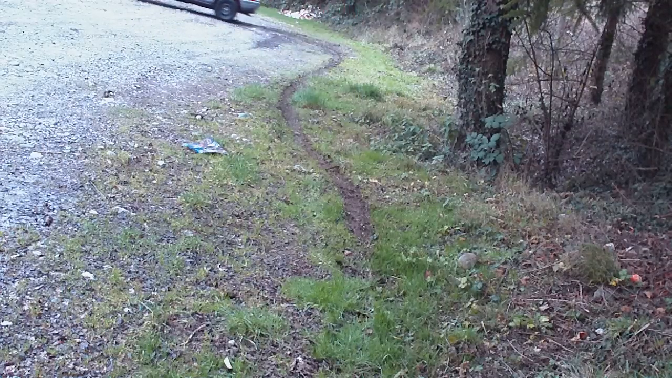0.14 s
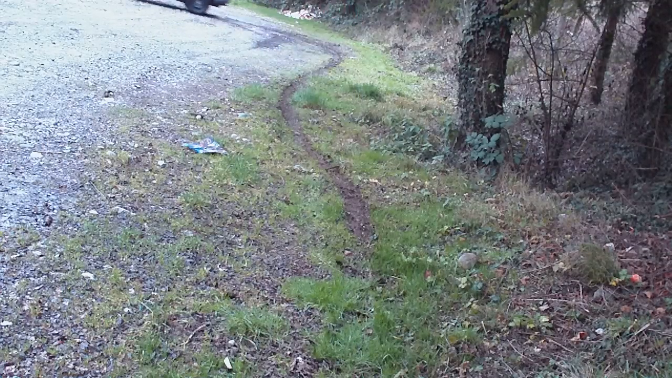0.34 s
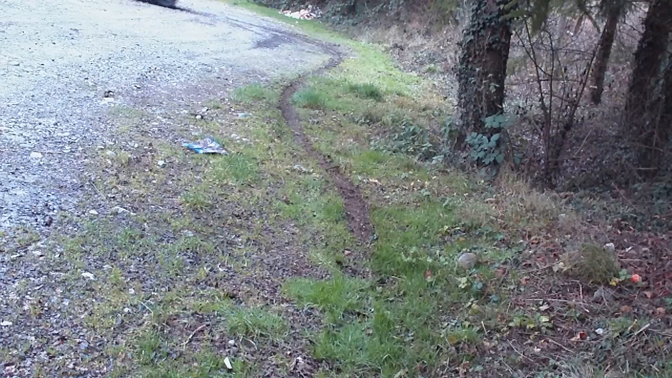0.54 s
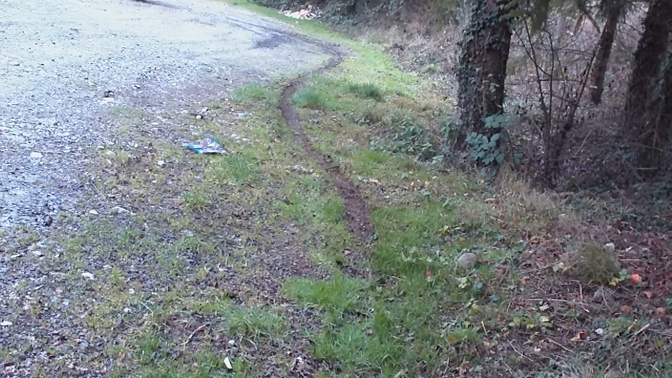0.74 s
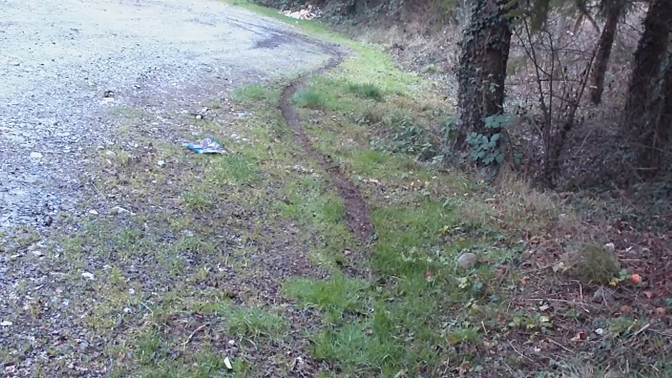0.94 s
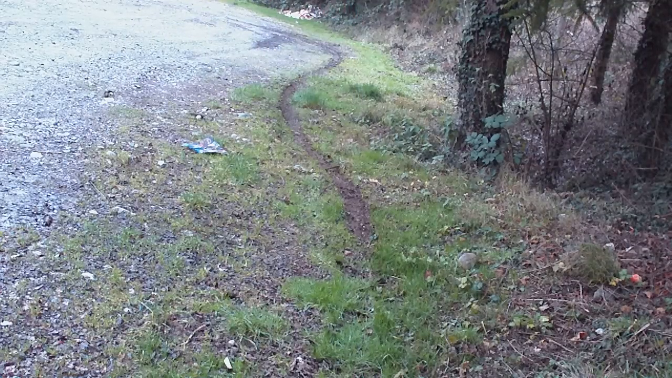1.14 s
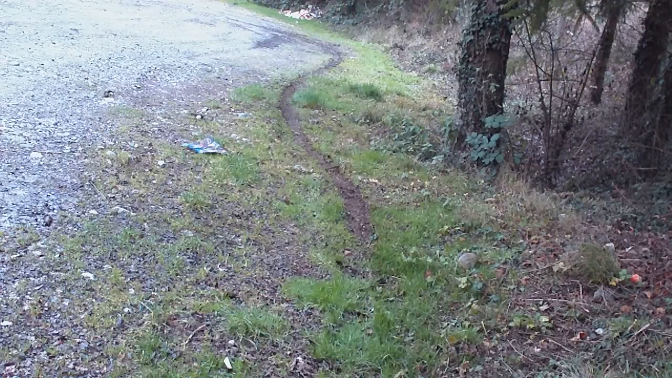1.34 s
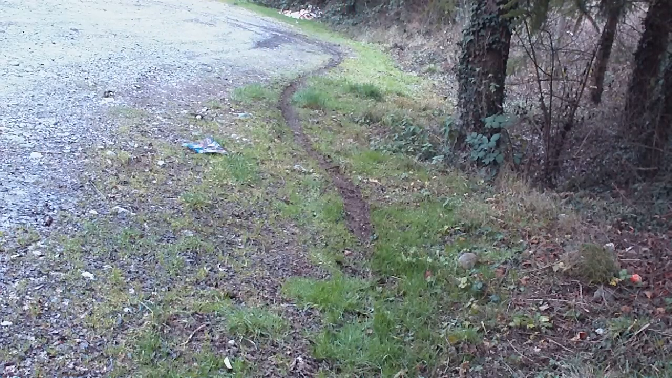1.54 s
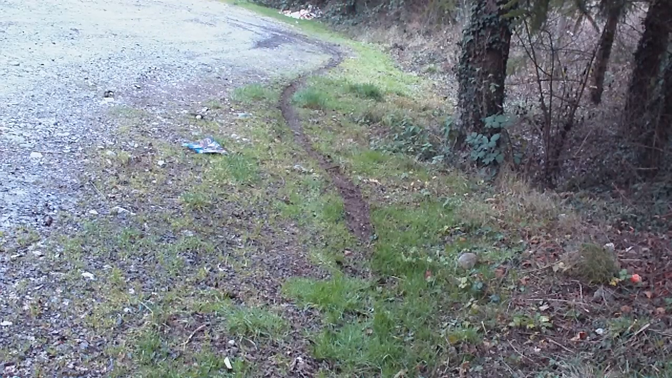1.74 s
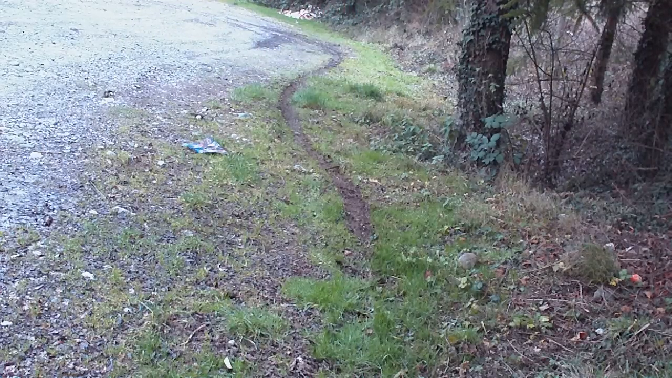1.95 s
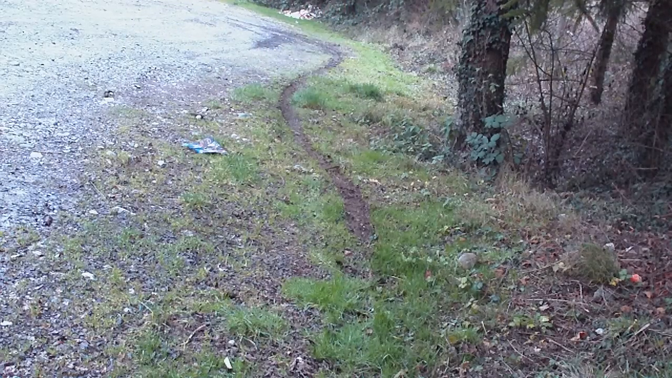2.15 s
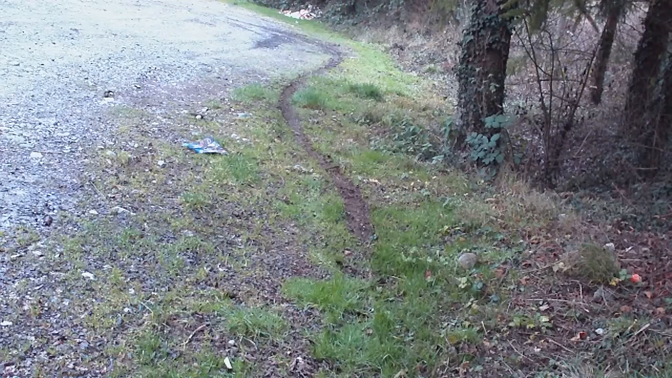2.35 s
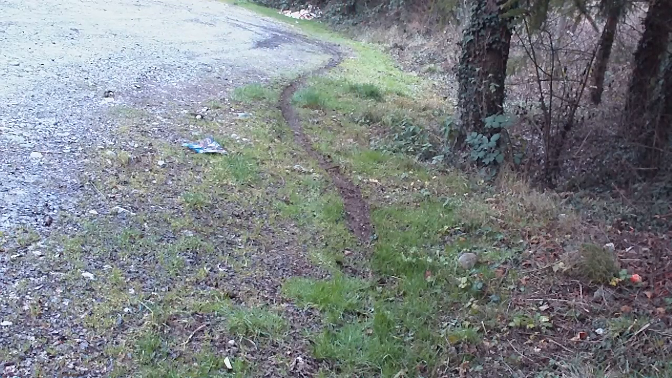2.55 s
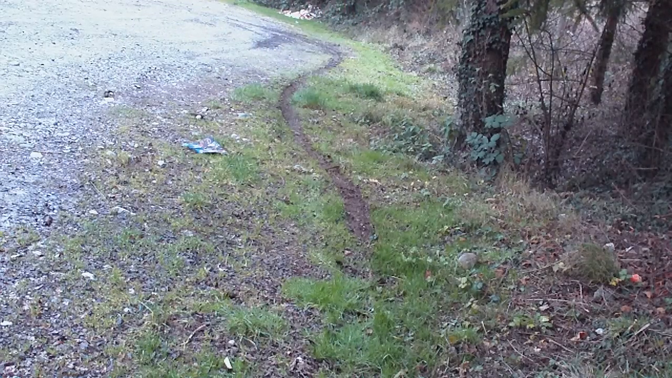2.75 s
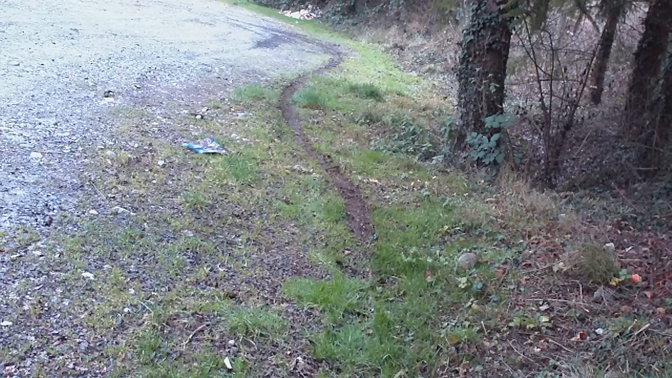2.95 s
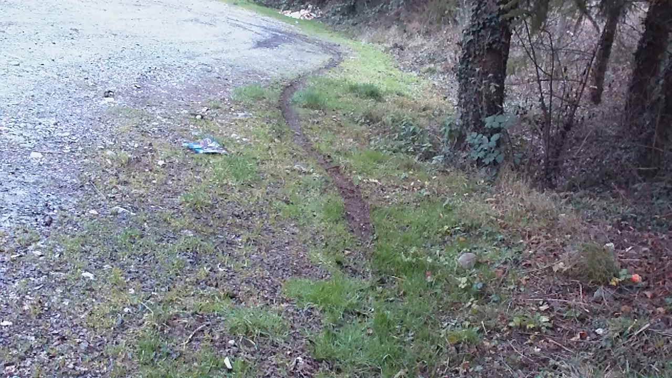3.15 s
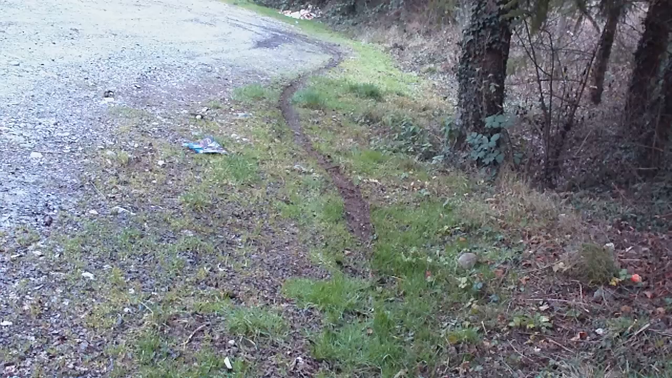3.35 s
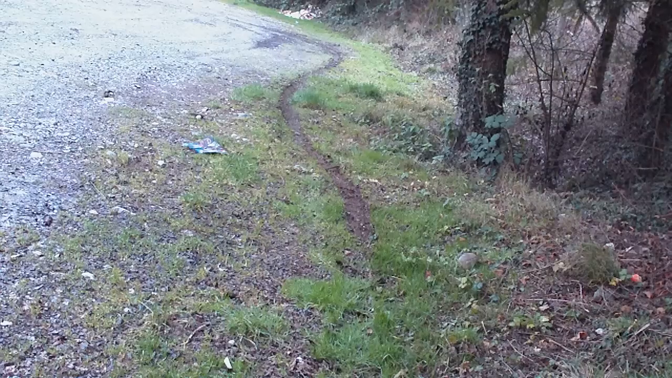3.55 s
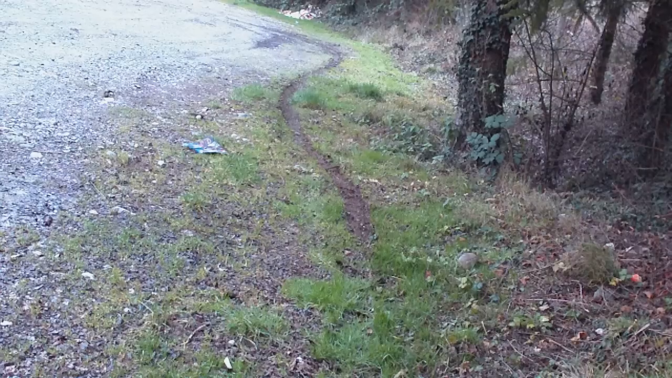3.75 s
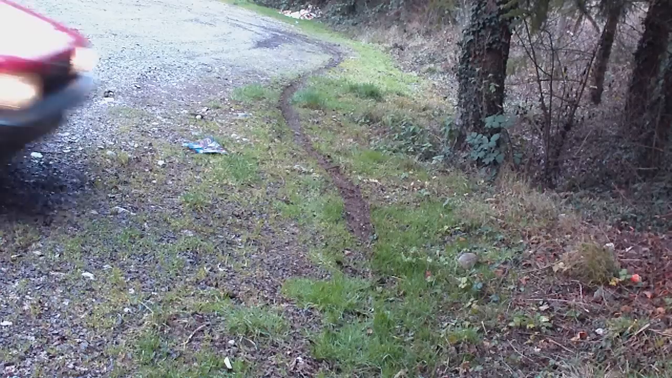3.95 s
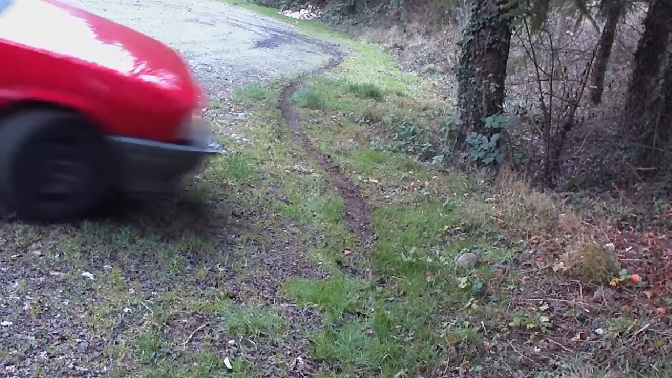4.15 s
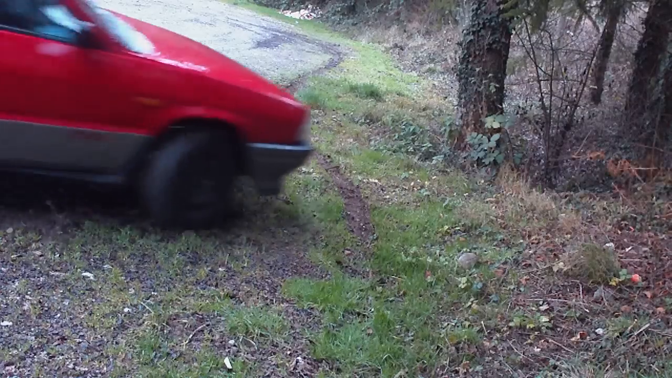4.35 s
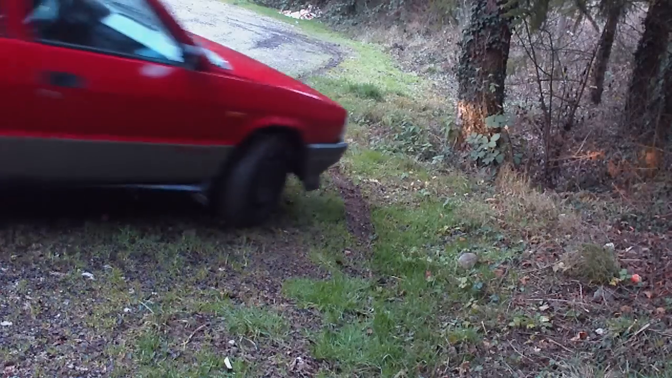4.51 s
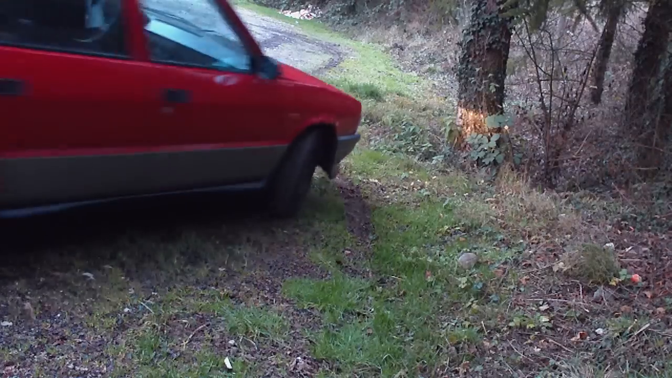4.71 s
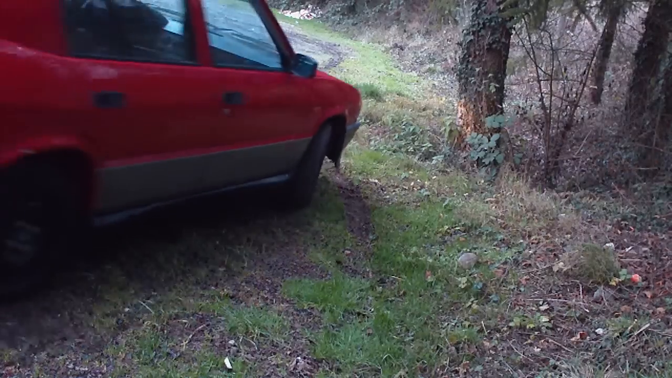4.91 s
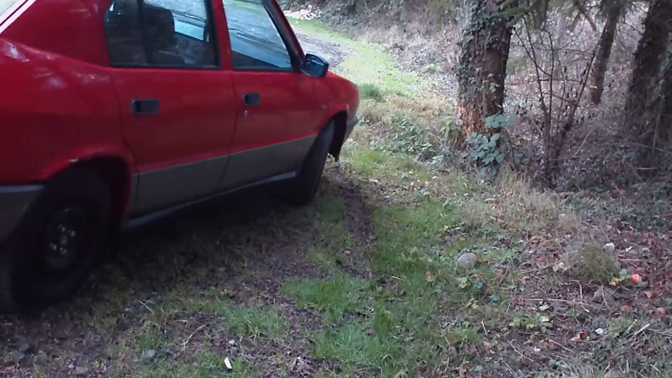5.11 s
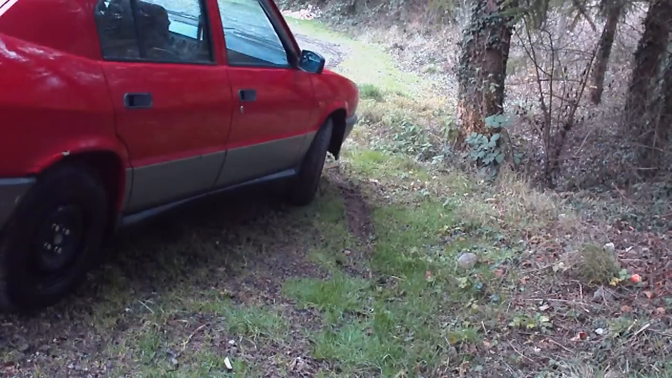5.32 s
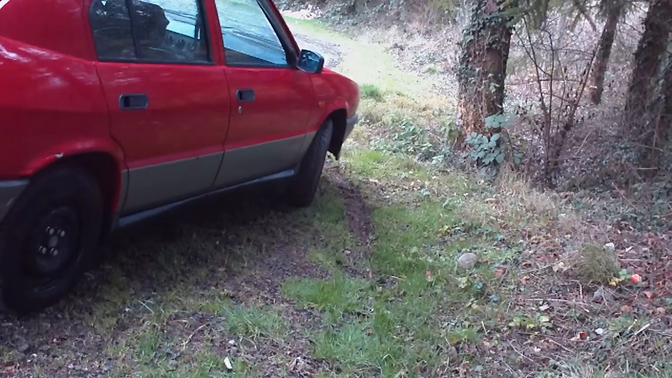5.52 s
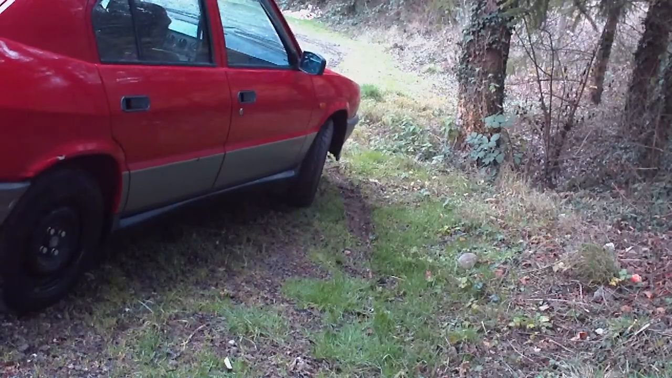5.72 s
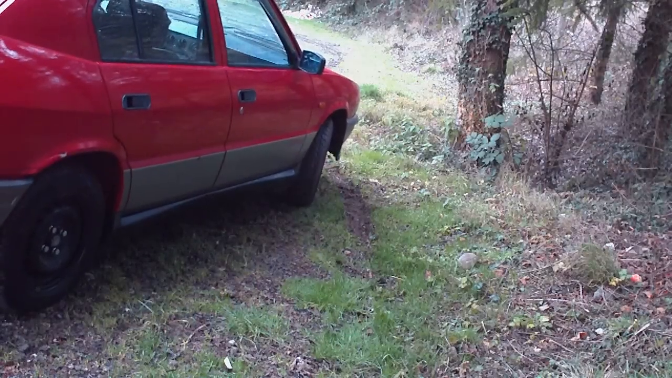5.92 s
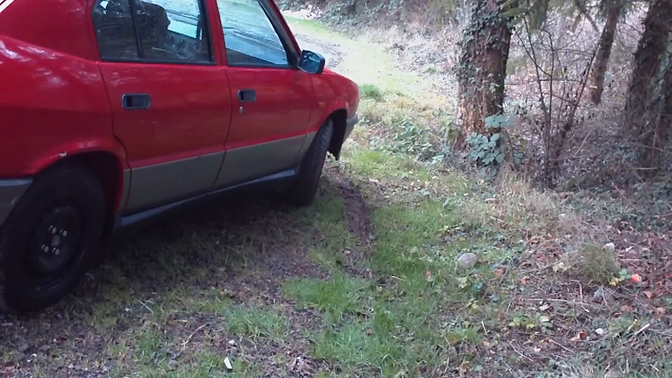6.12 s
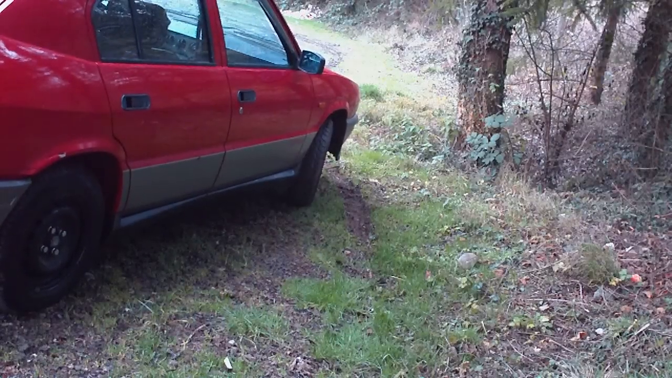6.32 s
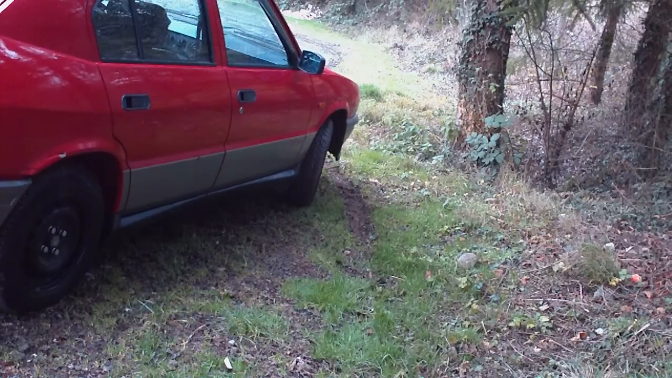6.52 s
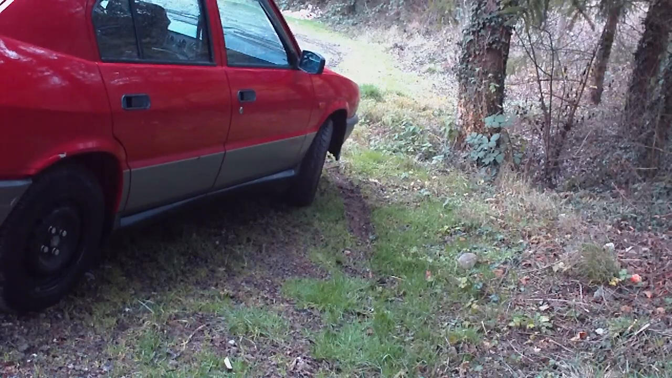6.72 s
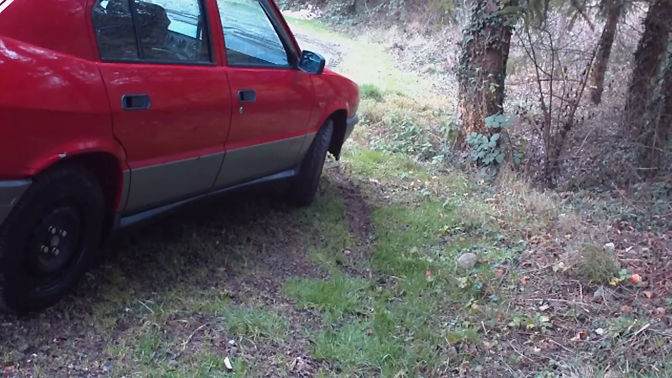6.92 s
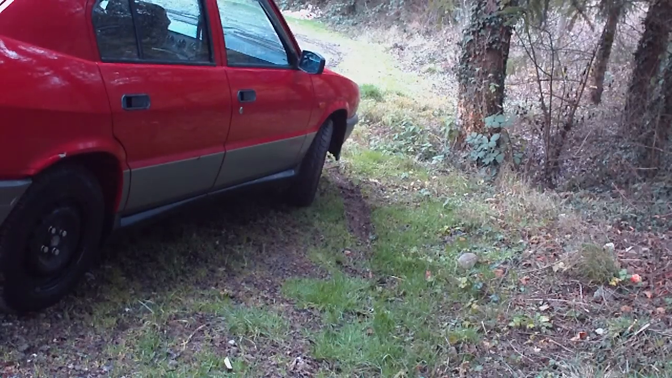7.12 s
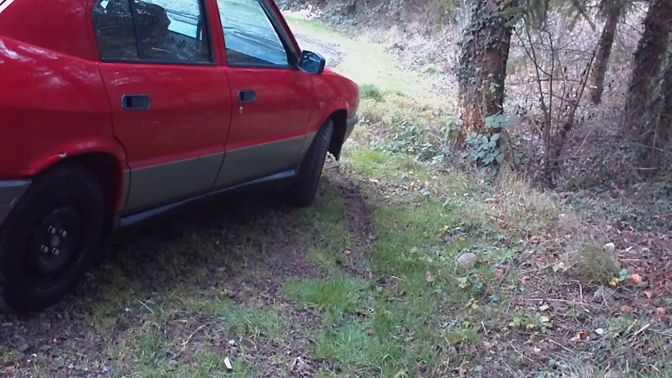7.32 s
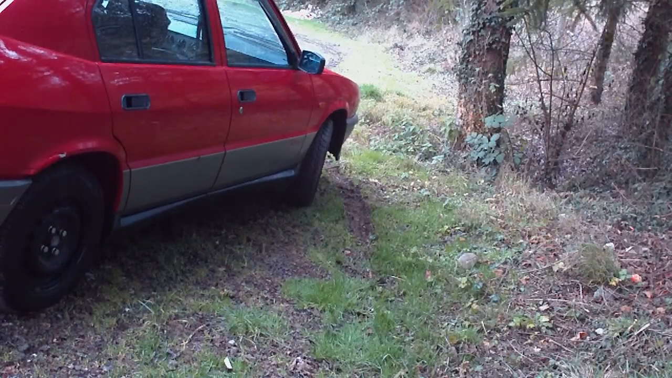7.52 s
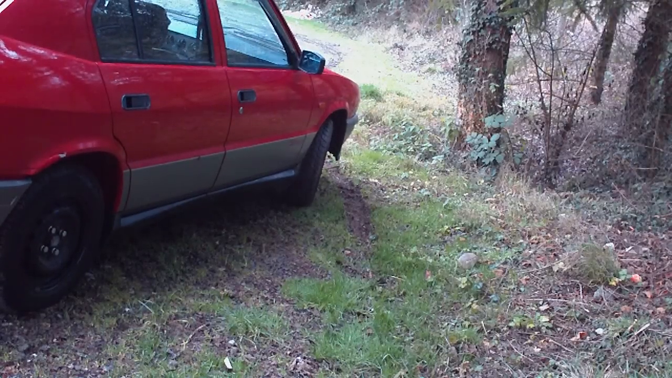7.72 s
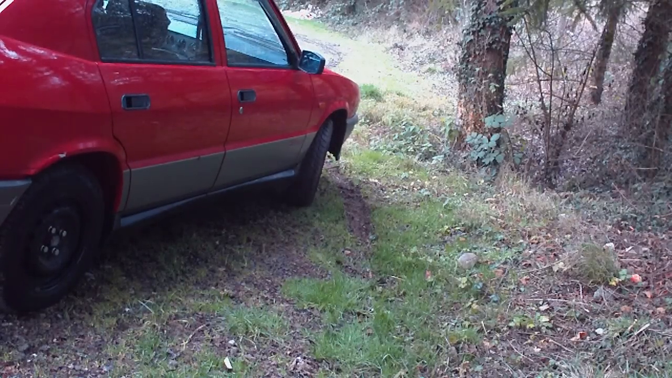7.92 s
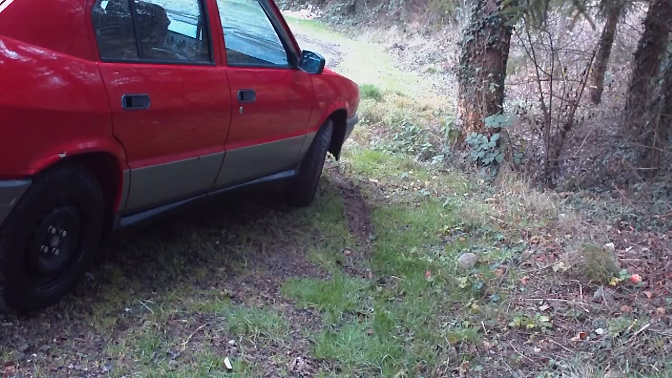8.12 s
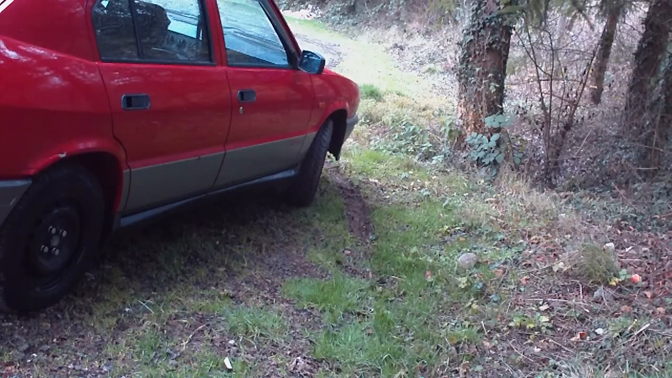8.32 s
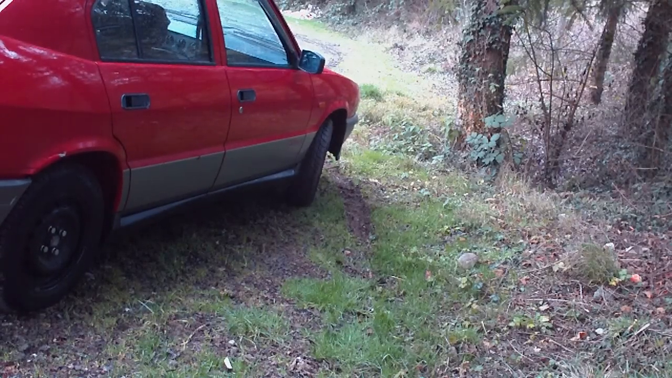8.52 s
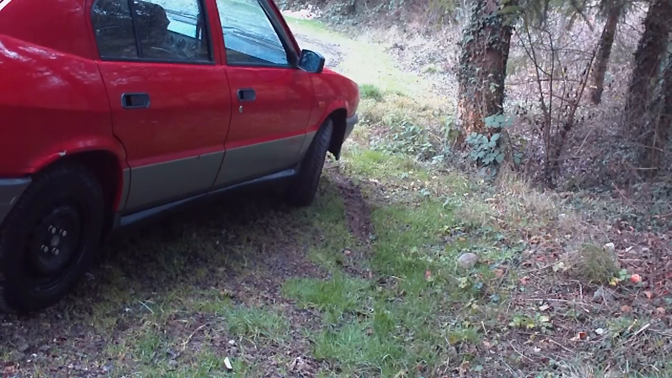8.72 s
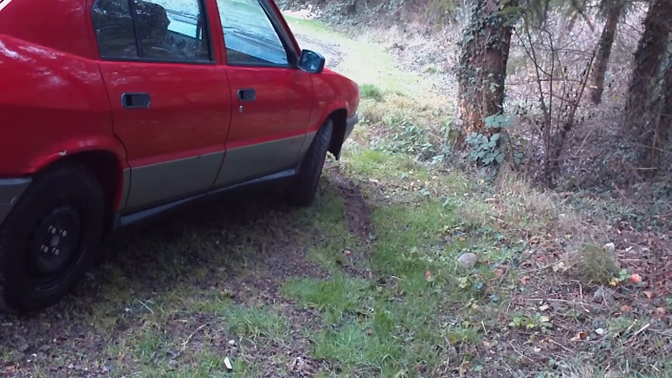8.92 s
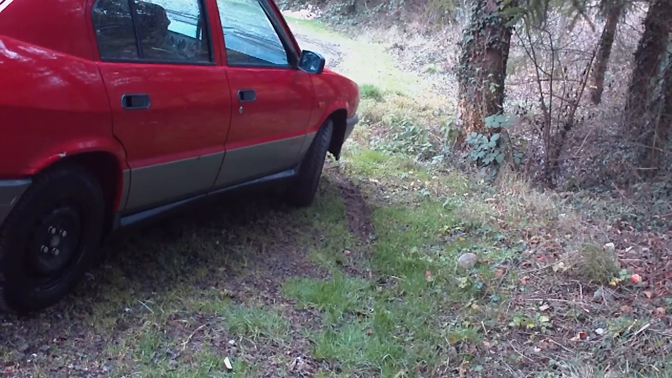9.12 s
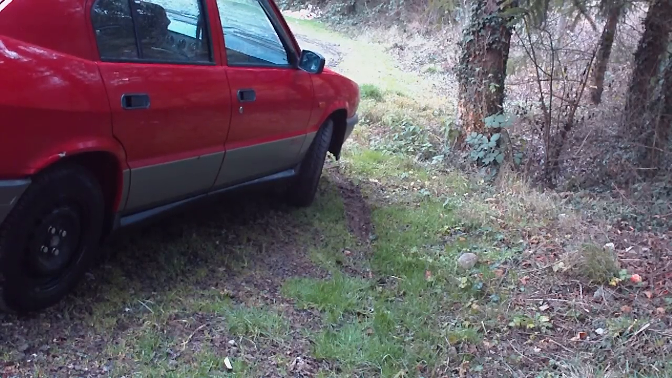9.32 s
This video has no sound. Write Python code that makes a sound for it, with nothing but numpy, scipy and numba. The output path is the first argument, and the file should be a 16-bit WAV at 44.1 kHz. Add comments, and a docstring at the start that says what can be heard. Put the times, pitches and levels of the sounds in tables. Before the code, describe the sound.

Raspy small-engine revs dip and rise over crackling gravel, tyres crunch loudly past the microphone, halt abruptly, and a steady puttering idle remains.

```python
"""A small four-cylinder car loops over a gravel track, rolls up beside the microphone and stops, idling.
Unequal firing pulses ring the exhaust resonances over a sine boom; the block whirs, sings and hisses as noise.
Tyres crunch and spray as clicks through resonances and filters, over a noise rumble.
Dozens of stones knock as short decaying sines; the crunch swells or dips around most of them."""
import sys
import numpy as np
from scipy import signal
from scipy.fft import rfft, irfft
from scipy.io import wavfile
from scipy.ndimage import uniform_filter1d
from numba import njit

SR = 44100
rng = np.random.default_rng(int(sys.argv[2]) if len(sys.argv) > 2 else 0)


def wav_record(signal):
    """Record a signal, one row per channel, as 16-bit PCM in the file named by sys.argv[1]."""
    frames = np.transpose(np.atleast_2d(signal))
    bounded = np.clip(frames, -1, 1)
    # unit amplitude maps onto the largest positive 16-bit level
    quanta = np.round(bounded * 32767).astype(np.int16)
    wavfile.write(sys.argv[1], SR, quanta)


N = 412776

# firing rate as the car loops, slows and idles: [t/s, f/Hz]
FIRING_RATE = [(0.0, 133.2), (0.2, 138.4), (0.4, 136.2), (.62, 116.5), (0.9, 99.5), (1.2, 77.95), (1.3, 82),
               (1.62, 103.7), (2.0, 119.5), (2.4, 129.9), (2.74, 136.9), (2.93, 131.3), (3.03, 122.5),
               (3.3, 116), (3.7, 104.3), (4.2, 89.8), (4.38, 80.3), (4.96, 64.43), (5.59, 54.86),
               (6.3, 50.87), (7.03, 48.22), (7.9, 48.85), (8.05, 46.6), (9.36, 45.5)]
# exhaust as the car turns and the throttle moves:
# [t/s, boom level/dB, note level/dB, loudest ring f/Hz, ring level/dB]
EXHAUST_MOVES = [(0, -41, -45, 276, -37), (.33, -45, -55, 277, -40), (.45, -57, -39.5, 266, -52),
                 (.62, -45.5, -45.5, 354, -55), (.85, -61.5, -48, 306, -44), (1.15, -54, -50, 243, -45),
                 (1.35, -76, -40, 250, -40), (1.55, -59, -39, 396.8, -40.5), (1.92, -50, -42.5, 350, -52),
                 (2.05, -50, -48, 370, -35.5), (2.2, -61, -33.5, 372, -31), (2.4, -44.5, -29.5, 397, -29),
                 (2.66, -48, -30.5, 399.7, -33), (2.76, -57, -37.5, 419, -37),
                 (2.9, -44, -46.5, 407, -38.5), (3.1, -50.5, -52, 365, -43), (3.5, -46, -54, 343, -54),
                 (4.15, -54, -43.5, 280, -35), (4.5, -39.5, -55.5, 233, -43), (5.4, -42.5, -37.5, 224, -47),
                 (5.7, -40, -41, 213.6, -39.5), (6.8, -38, -39.5, 215, -53), (7.88, -37.5, -39, 224, -50),
                 (8.1, -39, -42, 254.8, -36.5), (9.36, -39, -43, 247.9, -36)]
# strength of each cylinder: [level/dB]
CYLINDER_STRENGTH = [2.0, -1.6, 1.2, -1.6]
# unequal header pipes delay some pulses: [t/s]
CYLINDER_DELAY = [0.0003, 0.00017, 0.000047, 0.0009]
# fixed exhaust resonances: [f/Hz, width of one pass/Hz, level/dB]
EXHAUST_RESONANCES = [(93, 50, -7.5), (150, 52, -8.5), (207.6, 72, 1.5), (272, 71, -0.5), (342, 89, 0),
                      (422, 70, -13), (535, 110, -5), (773.4, 65, -8.5), (1060, 170, -20)]
# whir of block and fan: [t/s, level/dB]
WHIR_LEVEL = [(0, -60), (3.0, -46), (5.0, -36), (5.4, -38), (6.0, -38), (6.5, -39), (7.5, -41), (9.36, -42)]
# relative spectrum of the whir: [f/Hz, level/dB per Hz]
WHIR_SPECTRUM = [(25, -3), (70, 8), (92, -3), (125, -3), (260, -1), (480, -2), (750, -2), (1050, 0),
                 (1400, -9), (1950, -12.5), (2800, -11.5), (3700, -13.5), (4500, -12.5), (5500, -12),
                 (6700, -17), (7200, -26)]
# the block sings in three narrow bands and hisses in a broad one:
# [f/Hz, width of one pass/Hz, level relative to the whir/dB, change at rest/dB per s]
BLOCK_BANDS = [(558.6, 18, -10.5, -0.9), (1099, 22, -12.5, -4), (728.1, 30, -18, 1.5),
               (2650, 1500, -11.5, -2.5)]
# tyres on gravel, nearer and faster is louder: [t/s, crunch level/dB, spray level relative to crunch/dB]
TYRE_LEVELS = [(0.0, -23.5, -11), (0.25, -26, -9.5), (0.6, -28, -8.5), (1.1, -35, -8), (1.33, -33, -7.5),
               (1.75, -28, -8.5), (2.2, -24.5, -7.5), (2.64, -22.5, -4), (2.79, -25.5, -7),
               (3.3, -24.5, -9.5), (3.6, -21, -7.5), (4.2, -14, -7.5), (4.46, -14.5, -9), (4.54, -18, -5.5),
               (4.59, -19.5, -10), (4.65, -26.5, -6), (4.72, -21, -6.5), (4.77, -23.5, -4.5),
               (5.04, -24, -12), (5.14, -26.5, -10), (5.16, -33.5, -11), (5.22, -38, -10), (5.26, -49, -8),
               (5.35, -52, -1)]
# relative spectra of crunch, spray and carcass rumble: [f/Hz, level/dB per Hz]
CRUNCH_SPECTRUM = [(150, -49), (250, -16), (379, -6.5), (421, -7), (513, -4.5), (597, -3.5), (880, 1),
                   (1010, 2), (1150, -0.5), (1270, -10), (1450, -2), (1630, -9.5), (2290, -15), (2400, -14),
                   (3120, -32), (4500, -42)]
SPRAY_SPECTRUM = [(1290, -12.5), (2200, -2.5), (2480, -9), (2900, -0.5), (3340, -8.5), (3710, -5.5),
                  (5090, 0), (6090, -6), (6800, -6), (7300, -20)]
RUMBLE_SPECTRUM = [(15, -18.5), (35, -9.5), (70, -7.5), (140, -3.5), (250, -2.5), (400, -11.5), (800, -57)]
# stones knocking: [t/s, peak level/dB, f/Hz, ring t60/s, crunch level change around it/dB]
STONE_KNOCKS = [(0.083, -7.5, 985, 0.042, -2.5), (0.21, -10, 512, 0.045, 5.5),
                (0.261, -8.5, 754, 0.075, -1.5), (.314, -10.5, 1020, 0.056, -0.5),
                (0.357, -8.5, 1020, .03, 1), (0.519, -11.5, 490, 0.032, 3.5), (0.928, -13.5, 966, 0.05, 3),
                (0.996, -27, 940, 0.027, 5), (1.222, -20, 1043, .03, 3), (1.5895, -7, 700, 0.013, -2.5),
                (1.809, -24, 900, 0.031, 5.5), (1.938, -6, 1010, 0.021, 4), (3.419, -25, 1000, 0.031, 6),
                (3.811, -6, 1053, 0.048, 1), (3.868, -3, 990, 0.044, 2), (3.947, 0.5, 1007, 0.032, -0.5),
                (3.981, -5, 758, 0.043, -1), (4.029, -4, 880, 0.036, 2), (4.061, -2.5, 786, 0.044, 0),
                (4.132, -3, 833, 0.038, -4.5), (4.155, -1, 870, 0.035, 0.5), (4.228, -7, 714, .015, 2.5),
                (4.251, -4, 1020, 0.027, -0.5), (4.29, 2, 1123, 0.029, -3), (4.354, -5, 484, 0.058, -0.5),
                (4.535, -3, 819, .03, -2.5), (4.673, -14, 892, 0.035, 4.5), (4.795, -14, 1400, .02, 5),
                (4.8008, 0, 950, .035, 0), (4.9688, -1, 900, .009, 0), (4.9747, 2.5, 800, .009, 0),
                (4.9778, 5, 950, .027, 0), (4.9862, -8, 1012, .045, 4.5), (5.133, -16, 870, 0.034, 3)]
# modes of every stone: [multiple of its f, level/dB, share of its t60]
STONE_PARTIALS = [(1.0, -2.5, 0.99), (1.45, -11, 0.41), (.6, -14.5, 0.85)]

RING_WIDTH_HZ = 68.5  # of one pass
BRIGHT_DB_PER_OCTAVE, IDLE_HZ = 6.5, 51.4  # tone change as the firing rate climbs above idle
STOP_S = 5.3  # the car comes to rest
RUMBLE_DB = -17.5  # relative to the crunch level
JOLT_S, JOLT_DB, JOLT_WIDTH_S = 3.51, 5.5, 0.23  # the rumble swells once as the car swings in
CHANGE_RISE_S, CHANGE_FALL_S = 0.0096, 0.02  # crunch change before and after a knock
KNOCK_RISE = 0.07  # share of the ring time that a knock takes to swell
TOP_HZ = 7250


def engine():
    """One run of firings drives the exhaust and makes the block throb."""
    firing_hz, = curves(FIRING_RATE)
    turns = np.cumsum(firing_hz * (1 + 0.0012 * walk(9))) / SR  # one turn per firing
    return exhaust(firing_hz, turns) + block(turns)


def firings(firing_hz, turns):
    """Pulses with unequal strength and delay per cylinder, and an even version of the same firings."""
    at = np.flatnonzero(np.diff(np.floor(turns))) + 1
    strength_scatter, time_scatter = rng.standard_normal((N // 100, 2))[:len(at)].T
    pulses, even = np.zeros((2, N))
    # past the silencer the cylinders sound alike
    even[at] = undb(0.5 * strength_scatter)
    # burning varies by a share of the cycle
    late_s = np.resize(CYLINDER_DELAY, len(at)) + 0.004 * time_scatter / firing_hz[at]
    late_at = np.clip(at + np.round(late_s * SR).astype(int), 0, N - 1)
    pulses[late_at] = undb(np.resize(CYLINDER_STRENGTH, len(at)) + 0.5 * strength_scatter)
    return pulses, even


def exhaust(firing_hz, turns):
    """Firings ring fixed pipe resonances and one moving resonance over a pure boom at the firing rate."""
    boom_db, note_db, ring_hz, ring_db = curves(EXHAUST_MOVES)
    pulses, even = firings(firing_hz, turns)
    # with the revs the upper resonances open up and the lowest thin out
    bright = undb(BRIGHT_DB_PER_OCTAVE * np.log2(firing_hz / IDLE_HZ))
    note = np.zeros(N)
    for k, (hz, width_hz, db) in enumerate(EXHAUST_RESONANCES):
        if hz > 400:
            resonance = bright * band(even, hz, width_hz)
        else:
            resonance = band(pulses, hz, width_hz)
            if hz < 180:
                resonance = resonance / bright
        note += (-1) ** k * undb(db) * resonance / width_hz
    ring = svf(svf(even, ring_hz, RING_WIDTH_HZ), ring_hz, RING_WIDTH_HZ)
    boom = np.sqrt(2) * np.sin(2 * np.pi * turns + 2.42) * undb(walk(10))
    return undb(boom_db) * boom + undb(note_db) * steady(note) + undb(ring_db) * steady(ring)


def block(turns):
    """Whir throbs with the firings; noise bands, three narrow and one broad, sing and hiss, drifting at rest."""
    throb = 1 + 0.038 * np.cos(2 * np.pi * turns)
    whir = colour(throb * flicker(rng.standard_normal(N), 0.9, 9), WHIR_SPECTRUM)
    at_rest_s = np.maximum(np.arange(N) / SR - STOP_S, 0)
    sing_and_hiss = np.zeros(N)
    for hz, width_hz, db, db_per_s in BLOCK_BANDS:
        noise_band = level(band(rng.standard_normal(N), hz, width_hz), 0)
        sing_and_hiss += undb(db + db_per_s * at_rest_s + 0.93 * walk(4.5)) * noise_band
    whir_db, = curves(WHIR_LEVEL)
    return undb(whir_db) * (level(whir, 0) + sing_and_hiss)


def tyres():
    """Stones of every size grind and snap under the tread in patches; chips spray; the carcass rumbles."""
    crunch_db, spray_db = curves(TYRE_LEVELS)
    patch = undb(walk(30.01))
    rolling = np.arange(N) < TYRE_LEVELS[-1][0] * SR
    tread = undb(crunch_changes()) * level(crunch(patch), 0) + undb(spray_db) * level(spray(patch), 0)
    from_jolt = (np.arange(N) / SR - JOLT_S) / JOLT_WIDTH_S
    jolt = undb(JOLT_DB * np.exp(-from_jolt ** 2))
    return rolling * undb(crunch_db) * (tread + jolt * level(rumble(), RUMBLE_DB))


def crunch(patch):
    """Each size of stone rings a few cycles at its own pitch in its own bursts; broader snaps join in."""
    ringing = np.zeros(N)
    for hz in 300 * 2 ** np.arange(0, 3.3, 1 / 3):
        bursts = grains(400, spread_db=1.0) * undb(1.8 * walk(16))
        ringing += band(bursts, hz, 0.41 * hz)
    snaps = band(grains(160, spread_db=2.5), 1000, 1500)
    return colour((level(ringing, 0) + level(snaps, -9)) * patch, CRUNCH_SPECTRUM)


def spray(patch):
    """Dense clicks of flying chips merge into a flickering hiss."""
    hiss = flicker(grains(14000, spread_db=3.0), 1.74, 10)
    return colour(hiss * patch, SPRAY_SPECTRUM)


def rumble():
    """The tyre carcass rumbles as slowly wavering low noise."""
    return colour(rng.standard_normal(N) * undb(1.2 * walk(3.3)), RUMBLE_SPECTRUM)


def crunch_changes():
    """The crunch swells or dips around most knocks, starting just before and settling after (dB)."""
    t = np.arange(N) / SR
    change_db = np.zeros(N)
    for s, *_, db in STONE_KNOCKS:
        change_db += db * np.exp(np.where(t < s, (t - s) / CHANGE_RISE_S, (s - t) / CHANGE_FALL_S))
    return change_db


def stones():
    """Each knock excites a few short modes of the stone, which die away exponentially."""
    out, t = np.zeros(N), np.arange(SR // 10) / SR
    chance = rng.random((len(STONE_KNOCKS), len(STONE_PARTIALS)))
    for (s, peak_db, hz, t60, _), phases in zip(STONE_KNOCKS, chance):
        ring = np.zeros(len(t))
        for (multiple, db, share), phase in zip(STONE_PARTIALS, phases):
            decay = undb(db - 60 * t / (share * t60))
            ring += decay * np.sin(2 * np.pi * (multiple * hz * t + 0.15 * phase))
        swell = np.minimum(t / (KNOCK_RISE * t60), 1)
        i = int(s * SR)
        out[i:i + len(t)] += undb(peak_db) * ring * swell
    return out


def undb(db):
    """Decibels to gain."""
    return 10 ** (np.asarray(db) / 20)


def level(x, db):
    """Set the rms level."""
    return x * undb(db) / np.sqrt(np.mean(x ** 2))


def steady(x):
    """Hold the short-term rms (quarter second) near 1 while the firing rate changes."""
    return x / np.sqrt(uniform_filter1d(x ** 2, SR // 4))


def curves(table):
    """Each column of a table, joined by straight lines in time."""
    s, *columns = np.transpose(table)
    return [np.interp(np.arange(N) / SR, s, c) for c in columns]


def walk(rate):
    """Random levels held 1 / rate s and smoothed twice; spread near 0.75."""
    k = int(SR / rate)
    held = np.repeat(rng.standard_normal(N // k + 1), k)
    return 1.02 * uniform_filter1d(uniform_filter1d(held, k), k)[:N]


def grains(per_s, spread_db):
    """Random clicks of either sign, a few much larger than the rest."""
    when, how_big, sign = rng.random((3, N))
    size = undb(spread_db * np.minimum(-np.log(1 - how_big), 5))
    return (when < per_s / SR) * size * np.sign(sign - 0.5)


def flicker(x, depth_db, rate):
    """Half-octave bands from 250 Hz to 8 kHz, and the parts below and above, each waver on their own."""
    edges = 250 * 2 ** np.arange(0, 5.5, 0.5)
    spectrum, hz = rfft(x), np.arange(N // 2 + 1) * SR / N
    part = np.searchsorted(edges, hz)
    out = np.zeros(N)
    for k in range(len(edges) + 1):
        out += irfft(spectrum * (part == k), N) * undb(depth_db * walk(rate))
    return out


def colour(x, points):
    """Causal filter with the given (Hz, dB) shape, from the folded cepstrum."""
    hz, db = np.transpose(points)
    bins = np.maximum(np.arange(2049) * SR / 4096, 1)
    cepstrum = irfft(np.log(undb(np.interp(np.log(bins), np.log(hz), db))))
    # folding onto positive time gives minimum phase
    cepstrum[1:2048] *= 2
    cepstrum[2049:] = 0
    return signal.fftconvolve(x, irfft(np.exp(rfft(cepstrum))))[:N]


def band(x, hz, width_hz):
    """A fixed resonance applied twice, so the valleys stay dark."""
    b, a = signal.iirpeak(hz, hz / width_hz, fs=SR)
    return signal.lfilter(b, a, signal.lfilter(b, a, x))


@njit
def svf(x, hz, width):
    """State-variable band-pass whose centre may move; gain 1 at the centre."""
    y, band_state, low_state = np.empty(len(x)), 0., 0.
    for i in range(len(x)):
        g, k = np.tan(np.pi * hz[i] / SR), width / hz[i]
        v = (band_state + g * (x[i] - low_state)) / (1 + g * (g + k))
        band_state = 2 * v - band_state
        low_state += 2 * g * v
        y[i] = k * v
    return y


def scene():
    """Everything in the open, one microphone."""
    return (engine() + tyres() + stones())[None]


def record(dry):
    """The microphone chain thins the deepest bass, rounds the loudest peaks and cuts the top."""
    thin = signal.sosfilt(signal.butter(2, 30, "high", fs=SR, output="sos"), dry)
    top_cut = signal.ellip(10, 0.3, 80, TOP_HZ, fs=SR, output="sos")
    return signal.sosfilt(top_cut, np.tanh(thin))


dry = scene()
out = record(dry)
wav_record(out)
```